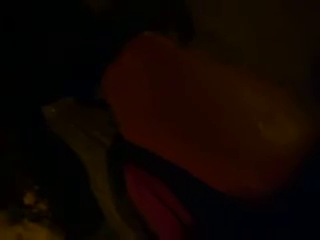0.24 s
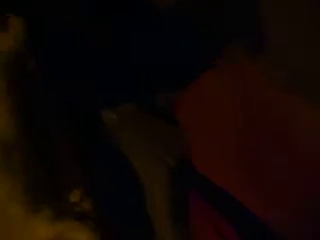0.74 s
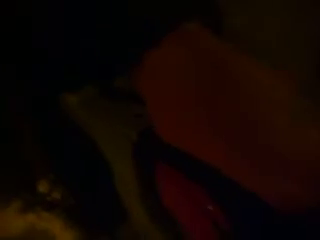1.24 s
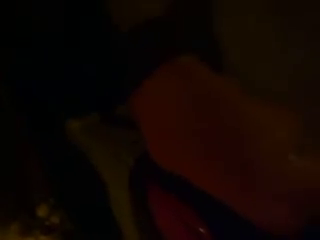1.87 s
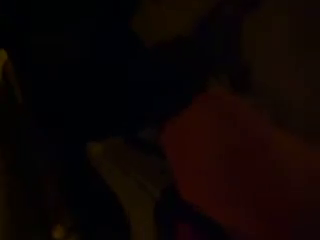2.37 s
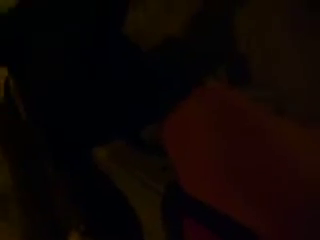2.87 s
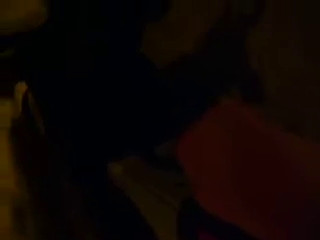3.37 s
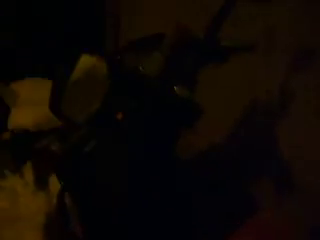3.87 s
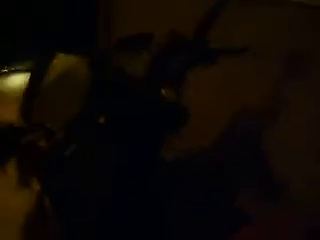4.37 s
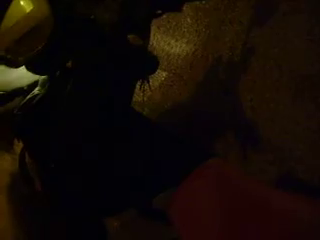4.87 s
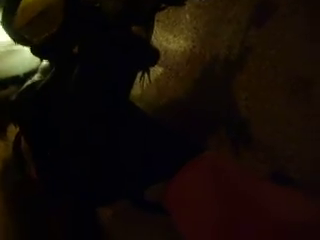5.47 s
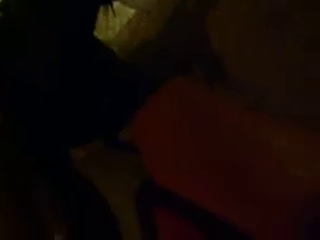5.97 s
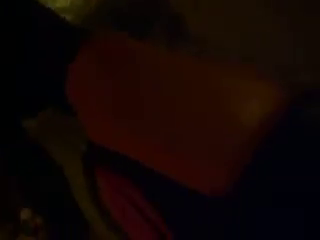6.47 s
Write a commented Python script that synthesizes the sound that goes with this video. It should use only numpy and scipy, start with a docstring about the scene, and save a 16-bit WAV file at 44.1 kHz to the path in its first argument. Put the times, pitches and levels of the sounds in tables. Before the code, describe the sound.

Two clanking kicks only spin a small two-stroke scooter engine; the third makes it fire and settle into a rising, rattly putter.

```python
"""Outdoors at night, between walls that return short echoes, a cold scooter engine is kick-started.
Twice the steel lever clacks down and the engine only coasts: gears clatter, the piston puffs air.
On the third kick it catches with hard pings and gathers speed, firing on every second turn with an
occasional stumble. Each turn pulses through exhaust pipe and airbox and rattles the ringing casing."""
import sys
import numpy as np
from scipy import signal
from scipy.fft import rfft, irfft, next_fast_len
from scipy.io import wavfile

SR = 44100
rng = np.random.default_rng(int(sys.argv[2]) if len(sys.argv) > 2 else 0)


def output_pcm(signal):
    """Save a mono or channel-first signal as 16-bit PCM at the path in sys.argv[1].

    Samples are clipped to [-1, 1] before scaling.
    """
    pcm = np.clip(np.atleast_2d(signal).T, -1, 1) * 32767
    wavfile.write(sys.argv[1], SR, np.round(pcm).astype(np.int16))


N = 296773
T = np.arange(N) / SR
CATCH_S = 4.237  # the first combustion
# The running crank. Each row: time in seconds, turns a second.
CRANK_SPEED = [(4.2, 21.33), (4.9, 20.83), (5.15, 22.97), (5.5, 26.16), (5.85, 27.52), (6.3, 28.91),
               (6.7, 30.22)]
# The coasting crank, one list a kick. Each row: time in seconds, then whirr, clack, puff in relative dB.
COAST_LEVELS = [
    [(0.62, -74, -68, -51), (0.734, -46.5, -48, -54.5), (0.82, -49, -33.5, -43), (1.07, -50, -31.5, -43.5),
     (1.19, -50.5, -42, -40.5), (1.25, -63, -47, -51), (1.31, -53, -38.5, -48), (1.49, -78, -38.5, -57),
     (1.8, -66.5, -58, -60)],
    [(2.1, -62, -45, -51), (2.14, -54, -39, -48), (2.256, -43, -34, -42), (2.35, -49.5, -39, -42),
     (2.634, -51, -32.5, -42.5), (2.98, -55, -32, -43.5), (3.19, -64, -41, -58), (3.3, -74, -60, -65)],
    [(4.04, -77, -40, -58), (4.092, -50, -35, -55), (4.19, -40.5, -25, -56), (4.26, -61, -50, -60),
     (4.32, -50, -50, -60)],
]


def gain_of(db):
    """Decibels as amplitude."""
    return 10 ** (np.asarray(db) / 20)


def unit_rms(x):
    """Scales x to unit power."""
    return x / np.sqrt(np.mean(x ** 2) + 1e-20)


def curve_at(points, hz):
    """Reads a curve along a logarithmic frequency axis."""
    f, value = np.transpose(points)
    return np.interp(np.log(hz + 1), np.log(f + 1), value)


def add(mix, s, sound):
    """Lays a sound into the mix at s seconds."""
    part = mix[max(round(s * SR), 0):][:len(sound)]
    part += sound[:len(part)]


def colour(x, spectrum):
    """Equalises x with a tone curve."""
    size = next_fast_len(len(x))
    gains = gain_of(curve_at(spectrum, np.fft.rfftfreq(size, 1 / SR)))
    return irfft(rfft(x, size) * gains, size)[:len(x)]


def noise(spectrum, size=N):
    """Coloured noise of unit power."""
    return unit_rms(colour(rng.standard_normal(size), spectrum))


def ring(x, modes):
    """Passes x through parallel resonances."""
    return sum(gain_of(db) * signal.lfilter(*signal.iirpeak(hz, hz / width, SR), x)
               for hz, width, db in modes)


def grit(spectrum, per_s, spread_db):
    """Many small contacts of uneven size."""
    sizes = gain_of(spread_db * np.minimum(rng.exponential(1, N), 4)) * rng.choice([-1, 1], N)
    return unit_rms(colour(sizes * (rng.random(N) < per_s / SR), spectrum))


def bursts(times, dbs, rise_s, fade_s):
    """An envelope that swells and fades after each of the times."""
    out, t = np.zeros(N), T[:SR // 4]
    for s, db, fade in zip(times, dbs, fade_s * np.ones(len(times))):
        add(out, s, gain_of(db) * (1 - np.exp(-t / rise_s)) * np.exp(-t / fade))
    return out


def night_air(air_db=-65.5, hiss_db=-70):
    """Quiet air with faint, steady bands of hiss."""
    # The air's tone. Each row: frequency in Hz, level in dB.
    air_tone = [(25, -9), (90, -9.5), (210, -6.5), (430, -4.5), (720, -7.5), (1100, -9.5), (2240, -16),
                (3300, -18.5), (4800, -16.5), (6200, -32), (8000, -45), (10000, -33.5), (11200, -66),
                (12300, -65)]
    # The hiss. Each row: centre in Hz, width in Hz, gain in dB.
    hiss_bands = [(1660, 60, -6), (2960, 130, 0), (5450, 220, -1), (7350, 80, -12)]
    air = gain_of(air_db) * noise(air_tone)
    return air + gain_of(hiss_db) * unit_rms(ring(rng.standard_normal(N), hiss_bands))


def blows(bounce_s=0.014, bounce_db=-2, tap_hz=5000):
    """Cues the blows of lever, ratchet and stand, and light taps of the loose lever that bounce once."""
    # The blows. Each row: start in seconds, then peak, thud and tick in relative dB, ring in Hz.
    hits = [(0.0365, -13, -45.5, -30, 4760), (0.3322, -21, -49, -43, 4910), (0.6, -27, -52, -58, 3560),
            (0.6293, -23.5, -42, -55, 3350), (0.6348, -16, -42, -32, 4800), (0.75, -31, -44, -43, 3550),
            (0.7844, -21, -30.5, -41, 4830), (0.7946, -24, -37.5, -43, 4570), (0.8129, -21, -50, -45, 2680),
            (0.9679, -16, -58, -33.5, 4760), (1.93, -22.5, -50.5, -51, 4630),
            (2.1114, -24.5, -55, -51, 3520), (2.1295, -12.5, -34.5, -29, 4440),
            (2.2638, -22, -33.5, -43, 3940), (2.2777, -16.5, -33, -33, 5860), (2.2914, -12, -34, -27, 6300),
            (2.425, -19.5, -63, -38.5, 4630), (2.8454, -31, -68, -59, 5600),
            (2.8691, -33.5, -64, -57, 5000), (2.9627, -29, -47, -49.5, 5100),
            (3.872, -21, -52.5, -46, 3520), (4.0644, -12, -37, -26.5, 3320), (4.152, -24, -54, -43, 4300),
            (4.1931, -9, -22.5, -25, 4500), (4.2209, -6, -32, -22, 5680), (4.2309, -17.5, -34.5, -32, 5300),
            (4.486, -36, -60, -54, 3540), (4.9856, -24, -49, -41, 4860), (5.7426, -14, -47, -37, 4720),
            (6.2606, -26, -39.5, -51, 2650)]
    # The taps. Each row: start in seconds, peak in relative dB.
    taps = [(0.5513, -37.5), (1.608, -43.5), (1.6787, -40), (2.0675, -39), (3.5564, -44), (3.6029, -41),
            (4.0267, -36.5)]
    touches = [(s + lag, db + drop) for s, db in taps for lag, drop in [(0, 0), (bounce_s, bounce_db)]]
    return list(hits) + [(s, db, db - 13.5, db - 18.5, tap_hz) for s, db in touches]


def knocks(crack_s=0.0016, rattle_s=0.013, ping_s=0.0021, thud_s=0.011, heavy_db=-32):
    """Each blow cracks, pings and shakes the panels; heavy ones set the steel lever ringing."""
    # Tones of the metal clank, panel thud and bright tick. Each row: frequency in Hz, level in dB.
    clank_tone = [(400, -44), (900, -7), (1400, 0), (2200, 1.5), (3000, -1), (4400, 1), (5600, -2.5),
                  (6700, -6), (8500, -47), (12500, -74)]
    thud_tone = [(50, -77), (140, -0.5), (220, 1.5), (310, 6), (650, 1), (820, -3), (1100, 2.5),
                 (1800, -29)]
    tick_tone = [(3000, -49), (6000, 1.5), (7600, 10), (9500, 1), (11000, -9), (12500, -45)]
    # The lever's resonances. Each row: pitch in Hz, width in Hz, gain in dB.
    lever_modes = [(832, 42, 7), (1296, 140, 0), (3820, 17, -13), (4330, 15, -28), (4450, 20, 3),
                   (5100, 28, -1), (5040, 64, 4.5), (5640, 37, 4)]
    out, heavy, t = np.zeros(N), np.zeros(N), T[:8192]
    for s, peak, thud, tick, hz in blows():
        rattle = 0.82 * gain_of(0.28 * (thud - peak)) * np.exp(-t / rattle_s)  # more thud, more rattle
        metal = gain_of(peak - 9) * noise(clank_tone, len(t)) * (np.exp(-t / crack_s) + rattle)
        ping = gain_of(peak - 10) * np.sin(2 * np.pi * hz * t) * np.exp(-t / ping_s)
        ping += ring(metal, [(hz, 900, -3)])
        swell = (1 - np.exp(-t / 0.004)) * np.exp(-t / thud_s)
        panels = gain_of(thud + 3) * noise(thud_tone, len(t)) * swell
        edge = gain_of(tick + 6) * noise(tick_tone, len(t)) * (np.exp(-t / 0.0015) + 0.19 * rattle)
        blow = np.minimum(t / 0.0013, 1) * (metal + ping + edge + panels)
        add(out, s, blow)
        add(heavy, s, blow * min(gain_of(thud - heavy_db), 1))
    return out + gain_of(3) * ring(heavy, lever_modes)


def wall_echoes(x, per_s=2500):
    """Sparse echoes from ground and walls, the bass lingering longest."""
    # The decay. Each row: frequency in Hz, seconds to fall by 60 dB.
    decay = [(150, 0.35), (1500, 0.13), (5000, 0.14), (10000, 0.14)]
    size = SR // 2
    taps = rng.choice([-1., 1.], size) * (rng.random(size) < per_s / SR) * (T[:size] > .006)
    hz, t, bands = signal.stft(taps, SR, nperseg=256)
    tail = signal.istft(bands * gain_of(-60 * t / curve_at(decay, hz)[:, None]), SR, nperseg=256)[1]
    return signal.fftconvolve(x, tail / np.linalg.norm(tail))[:N]


def coasting_turns():
    """Times of the coasting turns, and which are rebounds: a hard compression, then a softer turn."""
    # Each row is a kick: first compression in seconds, turns a second, slowing in turns a second
    # per second, rebound delay in seconds, number of turns.
    kicks = [(0.7135, 16.9, 0, 0.058, 14), (2.2205, 16.72, 7.36, 0.065, 14), (4.094, 16, 0, 0.063, 2)]
    t, rows = T[:SR], []
    for start, speed, slowing, rebound_s, count in kicks:
        for s in start + np.interp(np.arange(0, count, 2), speed * t - slowing * t ** 2 / 2, t):
            rows += [(s, 0), (s + rebound_s, 1)]
    return np.transpose(rows)


def transmission(modes):
    """Gear teeth ring at their resonances, heard through the cover."""
    # What the cover lets through. Each row: frequency in Hz, gain in dB.
    cover = [(600, 9.5), (1200, 1), (2500, -3), (4000, -5.5), (7000, -2), (12000, -45)]
    return unit_rms(colour(ring(rng.standard_normal(N), modes), cover))


def coasting_gears(rebound_db=-7.5):
    """The gears clack when nudged by hand or foot, and whirr and clatter as the unfired engine turns."""
    # The nudges. Each row: start in seconds, relative level in dB, fade in seconds.
    nudges = [(0.107, -45, 0.029), (3.52, -63.5, 0.21)]
    # The rattle's tone. Each row: frequency in Hz, level in dB.
    rattle_tone = [(60, -9.5), (300, 8), (550, -3.5), (1000, -3), (1600, 2), (2300, -7.5), (3500, -6.5),
                   (5200, -7), (7000, -21), (10000, -28.5), (12500, -61)]
    # The gears' resonances. Each row: pitch in Hz, width in Hz, gain in dB.
    gear_modes = [(1260, 50, -10), (1460, 65, 1.5), (1692, 120, 3), (2032, 43, 5.5), (2530, 130, -5)]
    times, rebound = coasting_turns()
    at, _, clack_db, _ = np.vstack(COAST_LEVELS).T
    contact = bursts(times, np.interp(times, at, clack_db) + rebound_db * rebound, 0.0019, fade_s=0.012)
    nudged, nudge_db, fade_s = np.transpose(nudges)
    contact += bursts(nudged, nudge_db, .0015, fade_s)
    whirr = sum(gain_of(np.interp(T, *np.transpose(kick)[:2], left=-120, right=-120))
                for kick in COAST_LEVELS)
    rattle = (gain_of(-13) * contact + gain_of(-2) * whirr) * grit(rattle_tone, 3000, spread_db=2.5)
    return rattle + (gain_of(-3) * contact + gain_of(-6) * whirr) * transmission(gear_modes)


def frame_bumps(frame_hz=152, fade_s=0.018):
    """The frame bumps on its stand, answering each hard push with one low, short note."""
    # The bumps. Each row: start in seconds, relative level in dB.
    pushes = [(0.334, -46), (0.634, -48.5), (0.788, -45), (1.931, -48.5), (2.134, -41.5), (2.284, -55),
              (3.872, -49.5), (4.194, -30.5)]
    out, t = np.zeros(N), T[:8192]
    note = np.sin(2 * np.pi * frame_hz * t) * (1 - np.exp(-t / 0.0029)) * np.exp(-t / fade_s)
    for s, db in pushes:
        add(out, s, gain_of(db) * note)
    return out


def airbox(flow):
    """Air drawn in rings the hollow airbox and is muffled by the filter."""
    # The box's resonances. Each row: pitch in Hz, width in Hz, gain in dB.
    box_modes = [(228, 14, -17), (280, 22, -1), (300, 26, 1), (326, 30, -2), (352, 22, -10), (413, 18, -6)]
    # What the intake lets out. Each row: frequency in Hz, gain in dB.
    air_filter = [(100, -36), (220, -18), (280, 5), (450, -2), (1200, -27)]
    return colour(ring(flow, box_modes), air_filter)


def exhaust_pipe(flow, turbulence):
    """Turbulent puffs boom in the pipe and leave through the silencer."""
    # The pipe's resonances. Each row: pitch in Hz, width in Hz, gain in dB.
    pipe_modes = [(106, 18, -4), (131, 18, 0), (168, 14, -7)]
    # What the silencer lets out. Each row: frequency in Hz, gain in dB.
    silencer = [(35, -14.5), (75, -5.5), (105, -1), (140, 0), (200, 1), (600, -30)]
    return colour(ring(flow * (1 + turbulence * rng.standard_normal(N)), pipe_modes), silencer)


def coasting_puffs(lag_s=0.005):
    """The unfired piston pumps air through pipe and airbox; the pipe puffs just after each clack."""
    times, _ = coasting_turns()
    at, _, _, puff_db = np.vstack(COAST_LEVELS).T
    dbs = np.interp(times, at, puff_db)
    outflow = bursts(times + lag_s, dbs, rise_s=0.0014, fade_s=0.0092)
    inflow = bursts(times - .001, dbs, rise_s=0.0018, fade_s=0.0039)
    pipe = unit_rms(exhaust_pipe(outflow, turbulence=0.9))
    box = unit_rms(airbox(inflow * rng.standard_normal(N)))
    return outflow.std() * (pipe + gain_of(-1.5) * box)


def crank_turns():
    """Crank angle in turns, and the firing times: every second turn, one turn later at a stumble."""
    # The stumbles. Each entry: time in seconds.
    stumbles = [6.085, 6.4]
    turns = np.cumsum(np.interp(T, *np.transpose(CRANK_SPEED))) / SR
    turns -= np.interp(CATCH_S, T, turns)
    due = np.arange(0, turns[-1], 2)
    for s in stumbles:
        due = due + (due >= np.round(np.interp(s, T, turns)))
    fired = np.interp(due[due < turns[-1]], turns, T)
    cycle = np.interp(T, fired, np.arange(len(fired)))
    return turns + .07 * np.sin(np.pi * cycle) ** 2, fired  # each firing hurries the crank on


def unit_running(x):
    """Scales x to unit power over the time the engine runs."""
    return x / x[T > CATCH_S].std()


def casing_clatter(turns, strength, slap_db=-2, fade_s=0.027):
    """The piston tips over once a turn and slaps the ringing casing, over a bed of fine rattle."""
    # The casing's tone. Each row: frequency in Hz, level in dB.
    casing_tone = [(60, -38), (300, 8.5), (520, -7.5), (640, -3), (760, -2), (940, -6.5), (1120, -6),
                   (1500, 0.5), (1800, -1), (2300, -4.5), (2700, -7), (3600, -9.5), (5200, -11),
                   (7000, -26.5), (10000, -32.5), (12500, -83)]
    # Its resonances. Each row: pitch in Hz, width in Hz, gain in dB.
    casing_modes = [(497, 56, -4), (615, 21, -12), (788, 18, -5.5), (850, 39, -3), (964, 24, 0.5),
                    (1590, 21, -6), (1730, 50, -7), (2740, 98, 0.5), (3020, 35, 2.5), (6370, 120, 3)]
    rattle = grit(casing_tone, 5000, spread_db=1.95) * (1 + 0.043 * np.cos(2 * np.pi * (turns - .1)))
    slaps, t = np.zeros(N), T[:4096]
    slap = noise(casing_tone, len(t)) * np.exp(-t / fade_s) * (1 - np.exp(-t / 0.002))
    for k in np.flatnonzero(np.diff(np.floor(turns)) > 0):
        add(slaps, T[k], strength[k] * slap)
    metal = rattle + gain_of(slap_db) * unit_running(slaps)
    return metal + ring(metal, casing_modes)


def firing_pings(fired, doublings, rich_db=21, rich_fade_s=0.073):
    """Each firing pings brightly, louder with speed; the first ones, rich with fuel, ping hardest."""
    # The ping's tone. Each row: frequency in Hz, level in dB.
    ping_tone = [(600, -13), (1500, -18), (3000, 2.5), (5200, 6.5), (7000, -0.5), (9000, -10.5),
                 (11000, -20), (12500, -63)]
    dbs = -43.5 + 6 * np.interp(fired, T, doublings) + rich_db * np.exp(-(fired - CATCH_S) / rich_fade_s)
    return grit(ping_tone, 2000, spread_db=0.53) * bursts(fired - .003, dbs, 0.0037, fade_s=0.013)


def drive_song(turns, fired, fresh_db=13, settle_s=0.45):
    """Shaken by the firings, the transmission sings, most just after the catch."""
    # The drive's resonances. Each row: pitch in Hz, width in Hz, gain in dB.
    drive_modes = [(1440, 32, -2), (1515, 32, 0), (1670, 55, -7)]
    dbs = -54.5 + fresh_db * np.exp(-(fired - CATCH_S) / settle_s)
    shaken = bursts(fired - .003, dbs, rise_s=0.0059, fade_s=0.024)
    held = 0.56 * gain_of(np.interp(T, fired, dbs, left=-120))
    throb = 1 + 0.54 * np.cos(2 * np.pi * (turns - .12))
    return transmission(drive_modes) * throb * (shaken + held)


def running_engine(idle_turns_per_s=21, puff_lag_turns=0.24, fired_db=-2):
    """Every turn puffs into the pipe, gulps air and slaps the piston; firings ping and shake the gears."""
    # Exhaust, intake and casing. Each row: relative level at idle in dB, dB per doubling of speed.
    levels = [(-53.5, 7), (-51.5, 13), (-44, 8.5)]
    turns, fired = crank_turns()
    alive = np.clip((T - CATCH_S) / 0.031, 0, 1)
    doublings = np.log2(np.interp(T, *np.transpose(CRANK_SPEED)) / idle_turns_per_s)
    exhaust, intake, casing = (gain_of(db + growth * doublings) * alive for db, growth in levels)
    # fired and unfired turns blow unequally, which puts half orders between the crank harmonics
    turn = turns.astype(int)
    burning = np.isin(turn, np.round(np.interp(fired, T, turns)))
    strength = gain_of(0.37 * rng.standard_normal(200)[turn] + fired_db * burning) * alive
    pulses = np.diff(np.floor(turns - puff_lag_turns), prepend=-1) * strength
    puffs = signal.lfilter([1], [1, -np.exp(-1 / (0.004 * SR))], pulses)
    pipe = exhaust * unit_running(exhaust_pipe(puffs, turbulence=0.41))
    gulp = alive * np.exp(-((turns + 0.1553) % 1) / 0.71)  # a sudden rush of air once a turn
    box = gain_of(-3.5) * intake * unit_running(airbox(gulp * (1 + 1.3 * rng.standard_normal(N))))
    metal = gain_of(-2) * casing * unit_running(casing_clatter(turns, strength))
    return pipe + box + metal + firing_pings(fired, doublings) + drive_song(turns, fired[1:])


def scene(echo_db=-10):
    """The scooter, its echoes and the night air."""
    scooter = knocks() + coasting_gears() + frame_bumps() + coasting_puffs() + running_engine()
    return (scooter + gain_of(echo_db) * wall_echoes(scooter) + night_air())[None]


def record(dry):
    """A steep low-pass takes off the highest treble."""
    low_pass = signal.firwin(301, cutoff=12350, window=("kaiser", 9), fs=SR)
    return signal.oaconvolve(dry, low_pass[None], "same")


dry = scene()
out = record(dry)
output_pcm(out)
```